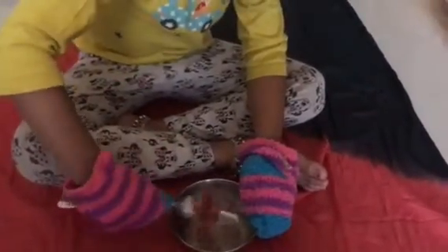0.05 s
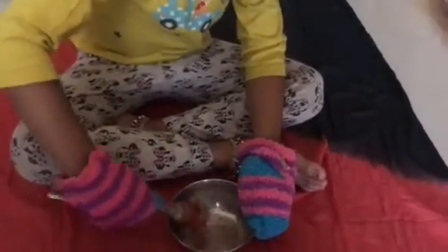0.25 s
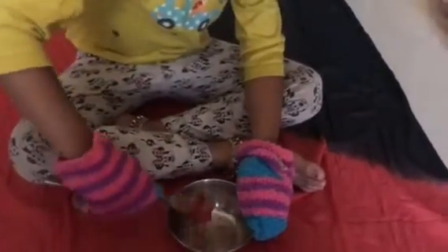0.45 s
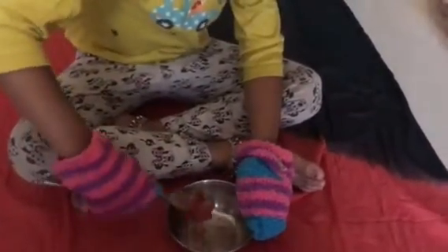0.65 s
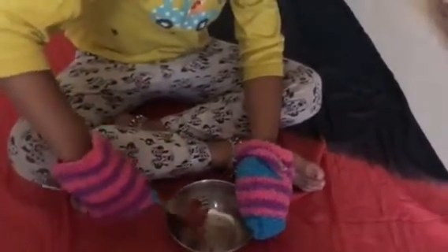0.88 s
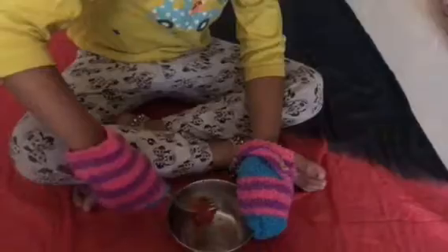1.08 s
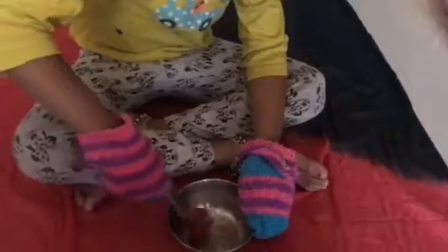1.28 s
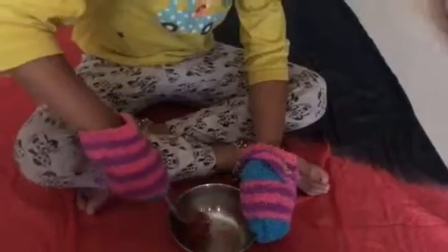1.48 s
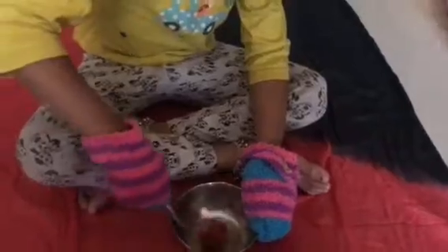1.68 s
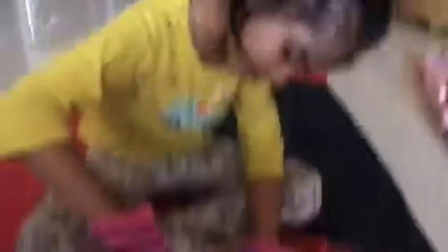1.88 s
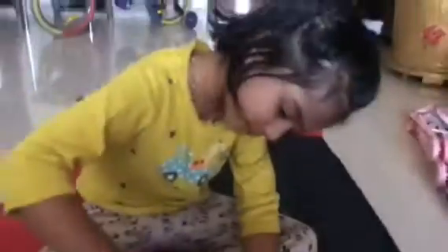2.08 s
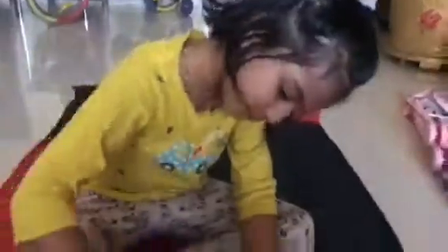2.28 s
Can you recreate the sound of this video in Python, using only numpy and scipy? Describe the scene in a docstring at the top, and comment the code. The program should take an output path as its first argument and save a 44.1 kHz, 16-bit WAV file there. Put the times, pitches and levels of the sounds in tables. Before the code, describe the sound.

A metal spoon knocks around inside a steel bowl in eight quick, regular strokes, each a bright clatter with a short ring. The last two are softer. It is heard up close in a small, quiet room.

```python
"""Over a low room rumble, a child starts knocking a metal spoon about in a steel bowl, eight strokes,
while a mittened hand holds the bowl on a mat. In each stroke the spoon chatters against the wall a few
times: bright clacks, then a short ring of spoon and damped rim, answered by a small hard room.
A faint hiss hangs around the strokes, and on the sixth the bowl bumps softly on the mat.
Two thin, faint tones linger at the end."""
import sys
import numpy as np
from scipy import signal
from scipy.fft import rfft, irfft
from scipy.io import wavfile
from scipy.ndimage import uniform_filter1d, minimum_filter1d

SR = 44100
rng = np.random.default_rng(int(sys.argv[2]) if len(sys.argv) > 2 else 0)


def wrap_up_sound(samples):
    """Save the sound to the file named by the first command line argument, as 16-bit audio."""
    columns = np.atleast_2d(samples).T
    # keep every value between -1 and 1, then stretch to whole-number steps
    tamed = np.clip(columns, -1, 1)
    steps = np.round(tamed * 32767).astype(np.int16)
    wavfile.write(sys.argv[1], SR, steps)


N = 108045

# spoon strokes: start_s, rim_ring_db, spoon_pitch_hz, spoon_ring_db, five place_db (one for each rim
# mode that depends on where the blow lands), room_send_db; all levels are offsets
STROKES = [(.226, 0, 2712, -1.5, 6.5, 8, -16, 4, 7.5, 0), (0.412, -2, 2770, -11, -1, 10, 2, -2, -1.5, 1),
           (.637, -11, 2570, -7, 2, -0.5, 4.5, 3.5, -17, -0.5),
           (.845, -11.5, 2614, -2, 4.5, -4.5, 0.5, -6, 4, 0),
           (1.05, -3, 2642, -1.5, -7, -4, -1, -10, -6, -1),
           (1.307, -3, 2687, 0.5, -12, -1, 5.5, -10, 4, 0.5),
           (1.571, -8, 4250, -11.5, -5, -13.5, -1.5, -1.5, 2, -1.5),
           (1.758, -2.5, 2443, -13.5, -6, -11.5, -3, 4, -1, -0.5)]


def undb(db):
    """Decibels to gain."""
    return 10 ** (np.asarray(db) / 20)


def unit(x):
    """Scale to rms 1."""
    return x / np.sqrt(np.mean(x ** 2))


def envelope(start_s, attack_s, t60_s):
    """Quick rise at the start, then exponential decay."""
    age = np.maximum(np.arange(N) / SR - start_s, 0)
    return (1 - np.exp(-age / attack_s)) * undb(-60 * age / t60_s)


def freqs():
    """Frequency of each spectral bin, at least 1 Hz."""
    return np.maximum(np.fft.rfftfreq(N, 1 / SR), 1)


def causal_filter(x, gain):
    """Minimum-phase filter with the given gain at each frequency: nothing rings ahead of a hit."""
    cepstrum = irfft(np.log(np.maximum(gain, 1e-5)), N)
    cepstrum[1:N // 2] *= 2
    cepstrum[N // 2:] = 0
    return irfft(rfft(x) * np.exp(rfft(cepstrum)), N)


def coloured_noise(points):
    """Noise with a spectrum of (freq_hz, relative_db) points, falling steeply outside them."""
    hz, db = np.array(points).T
    f = freqs()
    gain = undb(np.interp(np.log(f), np.log(hz), db)) / (1 + (f / hz[-1]) ** 8 + (hz[0] / f) ** 8)
    return unit(irfft(rfft(rng.standard_normal(N)) * gain, N))


def resonance(hz, width):
    """Power response of one resonance."""
    f = freqs()
    return 1 / (1 + ((f / hz - hz / f) * hz / width) ** 2)


def narrow_noise(hz, width):
    """Noise in one steep resonance: a wavering pitch."""
    return unit(irfft(rfft(rng.standard_normal(N)) * resonance(hz, width), N))


def room_tone(mic_noise_db=-78, hum_db=-58):
    """The bed: low rumble, soft air and a wavering hum, over the microphone's own noise."""
    # colours of the rumble and of the air: freq_hz, relative_db
    rumble_colour = [(12, -32.5), (20, -21.5), (53, 3.5), (147, -4), (182, -3.5), (226, -14.5),
                     (312, -15.5), (409, -28.5), (500, -35), (650, -57), (1100, -120)]
    air_colour = [(240, -26.5), (400, -5), (906, -6), (1110, -4), (2880, -14), (3260, -15.5), (3810, -19),
                  (4730, -25), (16000, -42.5)]
    # slow level ride of the bed: time_s, rumble_db, air_db
    level_ride = [(0, -48.5, -56), (.7, -49.5, -55.5), (1.2, -51.5, -57.5), (1.699, -49.5, -56),
                  (1.95, -47, -56), (2.45, -46, -56.5)]
    t = np.arange(N) / SR
    time_s, rumble_db, air_db = np.array(level_ride).T
    rumble = undb(np.interp(t, time_s, rumble_db)) * coloured_noise(rumble_colour)
    air = undb(np.interp(t, time_s, air_db)) * coloured_noise(air_colour)
    mic_noise = undb(mic_noise_db) * rng.standard_normal(N)
    hum = undb(hum_db) * narrow_noise(hz=64.1, width=6)
    return rumble + air + mic_noise + hum


def treble_hiss(start_s=0.18, end_s=2.18, level_db=-68, fade_s=0.03):
    """A faint treble hiss hangs on during and after the strokes."""
    # colour of the hiss: freq_hz, relative_db
    hiss_colour = [(5000, -3), (9000, -2), (14000, 0), (17000, -2)]
    t = np.arange(N) / SR
    fade = np.clip(np.minimum(t - start_s, end_s - t) / fade_s, 0, 1)
    return undb(level_db) * fade * coloured_noise(hiss_colour)


def thin_tones(rise_s=0.042):
    """Two faint high tones fade slowly, each a sine roughened by a narrow band of noise."""
    # lingering tones: start_s, pitch_hz, width_hz, level_db, t60_s
    tones = [(1.84, 3152, 35.4, -59.5, 2.65), (1.889, 3563, 80, -55, 0.66)]
    t, out = np.arange(N) / SR, np.zeros(N)
    for start, hz, width, db, t60 in tones:
        wavering = np.sin(2 * np.pi * hz * t) + narrow_noise(hz, width)
        out += undb(db) * envelope(start, rise_s, t60) * wavering
    return out


def room_reverb(x, send_db=-9, predelay_s=0.002, build_s=0.0017):
    """A small hard room: a diffuse tail, longest in the upper mids, fed by each stroke at its own level."""
    # bands of the tail: centre_hz, t60_s, relative_db
    bands = [(501, 0.14, 1.5), (1620, 0.32, 4.5), (2780, 0.38, 6), (3900, 0.5, -10), (5000, 0.46, -0.5),
             (10240, 0.31, -3.5), (15400, .27, -7.5)]
    log_centres = np.log([row[0] for row in bands])
    noise, tail = rfft(rng.standard_normal(N)), np.zeros(N)
    for (_, t60, db), share in zip(bands, np.eye(len(bands))):
        band = irfft(noise * np.interp(np.log(freqs()), log_centres, share), N)
        tail += undb(db) * band * unit(envelope(predelay_s, build_s, t60)) / np.sqrt(N)
    strokes = np.array(STROKES)
    send = undb(send_db + np.interp(np.arange(N) / SR, strokes[:, 0], strokes[:, -1]))
    return signal.fftconvolve(x * send, tail)[:N]


def mat_bump(level_db=-46):
    """The bowl bumps on the mat: one soft, low thud."""
    thud = envelope(start_s=1.303, attack_s=0.001, t60_s=0.14)
    return undb(level_db) * thud * narrow_noise(hz=260, width=70)


def bowl_and_spoon_ring(bowl_db=-30.5, spoon_db=-30.5, scatter_db=2.4, attack_s=0.001, spoon_t60_s=0.21):
    """Bowl and spoon ring after each stroke; the place of the blow favours or misses the lower rim modes."""
    # ringing modes of the bowl, one list each: pitch_hz, relative_db, t60_s
    mode_hz = [1654, 3520, 3785, 4190, 4532, 5577, 6657, 7715, 8759, 9746, 13252, 13665, 14225, 15072]
    mode_db = [-5, -3, -9, -13, -6, 0, -1, -3, -4, -11, -5, -12, -13, -10]
    mode_t60_s = [0.29, 0.19, 0.2, 0.22, .25, 0.16, 0.17, .22, 0.22, .23, 0.11, .26, .22, .18]
    # rim modes whose strength depends on the place of the blow: pitch_hz
    place_modes = [1654, 3520, 4532, 5577, 6657]
    t, out = np.arange(N) / SR, np.zeros(N)
    for start, rim_ring_db, spoon_hz, spoon_ring_db, *place_db, _ in STROKES:
        accent_db = dict(zip(place_modes, place_db))
        for hz, db, t60 in zip(mode_hz, mode_db, mode_t60_s):
            level_db = bowl_db + rim_ring_db + db + accent_db.get(hz, 0)
            level_db += scatter_db * rng.standard_normal()
            partial = np.sin(2 * np.pi * (hz * t + rng.random()))
            out += undb(level_db) * envelope(start, attack_s, t60) * partial
        spoon = envelope(start, attack_s, spoon_t60_s) * np.sin(2 * np.pi * spoon_hz * t)
        out += undb(spoon_db + spoon_ring_db) * spoon
    return out


def spoon_clacks(level_db=-9.5, attack_s=0.00036, base_t60_s=0.035, crossover_hz=7700):
    """Each contact briefly shakes a dense cluster of wall modes, with a brightness of its own."""
    # contacts of spoon and bowl: start_s, relative_db, extra_treble_db
    contacts = [(0.2215, -0.5, -4.5), (0.2286, -0.5, 0.5), (0.2356, -15, 6), (0.4106, 1, -1),
                (0.4172, -2, 4.5), (.4215, -11.5, -0.5), (0.426, -4.5, 1), (0.6336, -3.5, 4.5),
                (0.6368, 0, 1), (0.6431, -6, 3), (.6500, -13, 5.5), (0.8419, -1.5, -2.5), (0.8432, -0.5, 7),
                (0.8508, -5, 2), (0.8553, -16, -1.5), (0.8592, -13.5, 5), (1.0447, -3, 2.5),
                (1.0504, 0, -5.5), (1.0560, -9, 10.5), (1.0606, -8, 2), (1.066, -12.5, 1.5),
                (1.0706, -14, 7), (1.301, -0.5, 3), (1.3083, 0, -3), (1.3152, -10.5, 2), (1.3157, -9.5, 8),
                (1.324, -11.5, 7.5), (1.5681, -10.5, -1.5), (1.5755, -14, 2), (1.7595, -8.5, 9),
                (1.76, -12, -2)]
    # broad, quickly damped resonances of wall and spoon: centre_hz, width_hz, relative_db
    wall_modes = [(700, 140, -25.5), (1008, 118, -14.5), (1218, 160, -8), (1655, 99, -12.5),
                  (2373, 230, -13), (2718, 190, -7.5), (3820, 300, 2), (4240, 150, -10.5),
                  (6110, 2180, -16.5), (6650, 160, -6.5), (7870, 1400, -13), (9660, 190, -11.5),
                  (11176, 240, -8), (12800, 180, -1.5), (13120, 180, 1.5), (13560, 220, -7),
                  (14520, 130, -4.5), (14700, 260, -0.5), (15200, 166, -1.5)]
    body_power, treble_power = np.zeros(N), np.zeros(N)
    for start, db, treble_db in contacts:
        t60 = base_t60_s * undb(0.12 * db)  # harder contacts buzz longer
        power = (undb(db) * envelope(start, attack_s, t60)) ** 2
        body_power += power
        treble_power += power * undb(treble_db) ** 2
    wall_power = sum(undb(db) ** 2 * resonance(hz, width) ** 1.222 for hz, width, db in wall_modes)
    wall = unit(np.sqrt(wall_power))
    treble_share = 1 / (1 + (crossover_hz / freqs()) ** 6)
    body_bursts = np.sqrt(body_power) * rng.choice([-1, 1], N)
    treble_bursts = np.sqrt(treble_power) * rng.choice([-1, 1], N)
    body = causal_filter(body_bursts, wall * np.sqrt(1 - treble_share))
    treble = causal_filter(treble_bursts, wall * np.sqrt(treble_share))
    return undb(level_db) * (body + treble)


def scene(ring_send_db=-6):
    """The mono mix: spoon and bowl up close, the room's answer and the quiet layers behind them."""
    clacks, ring = spoon_clacks(), bowl_and_spoon_ring()
    reverb = room_reverb(clacks + undb(ring_send_db) * ring)
    return (clacks + ring + reverb + mat_bump() + treble_hiss() + room_tone() + thin_tones())[None]


def record(dry, limit_db=-4.5, hold_s=0.00076, top_hz=15800):
    """A fast limiter holds down the peaks of the clacks; a steep low-pass cuts the top."""
    span = int(hold_s * SR)
    gain = np.minimum(1, undb(limit_db) / np.maximum(np.abs(dry), 1e-9))
    smooth_gain = uniform_filter1d(minimum_filter1d(gain, span), span)
    low_pass = signal.ellip(8, .2, 70, top_hz, fs=SR, output="sos")
    return signal.sosfilt(low_pass, dry * smooth_gain)


dry = scene()
out = record(dry)
wrap_up_sound(out)
```